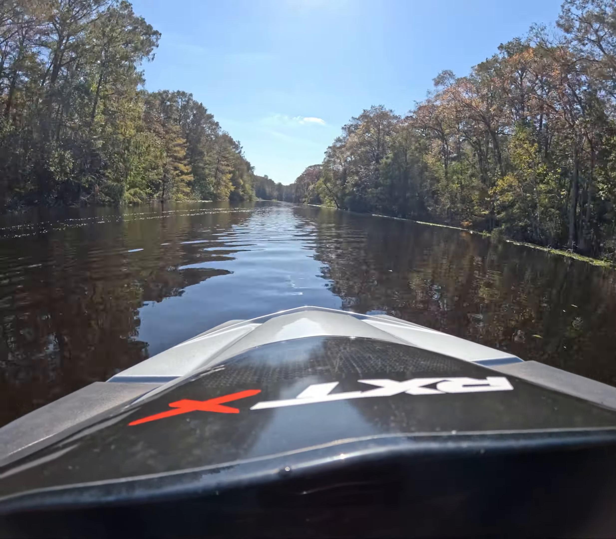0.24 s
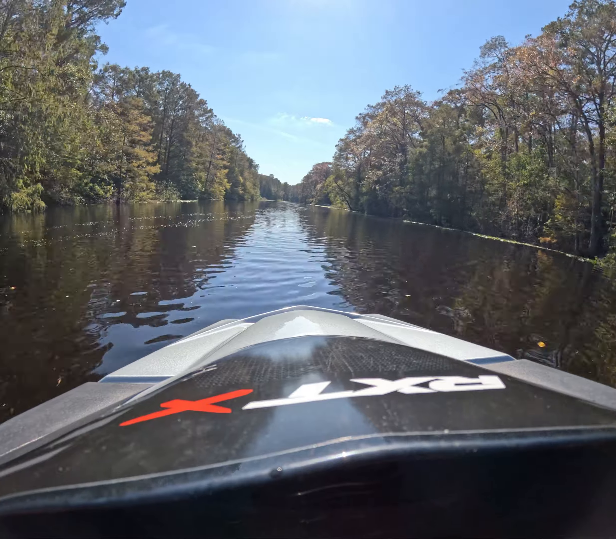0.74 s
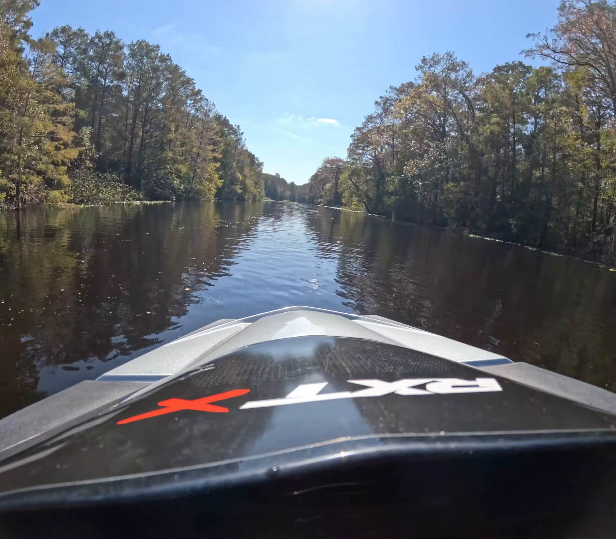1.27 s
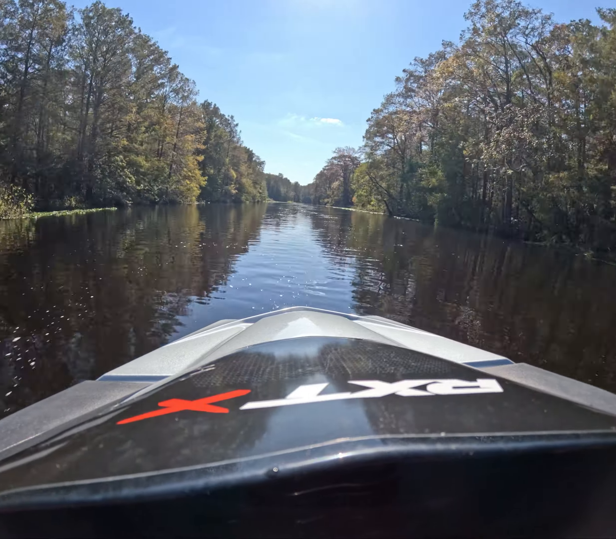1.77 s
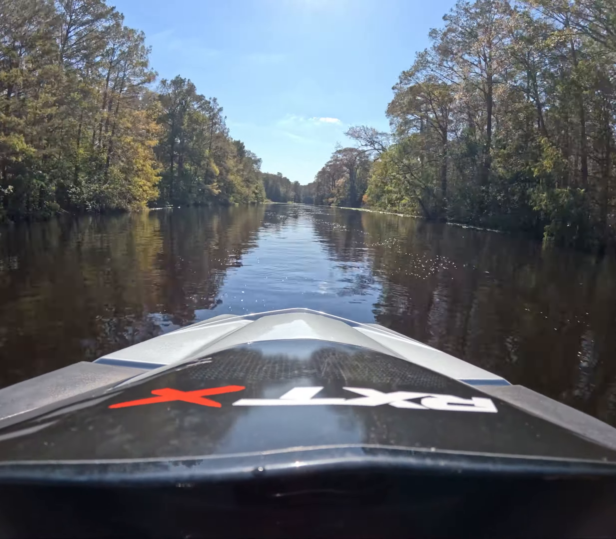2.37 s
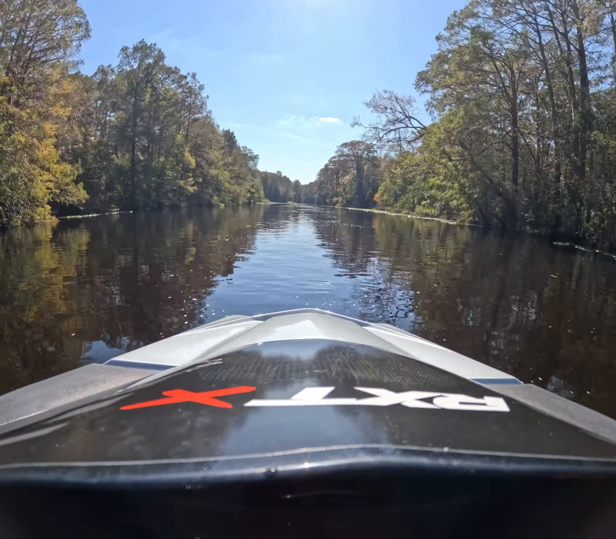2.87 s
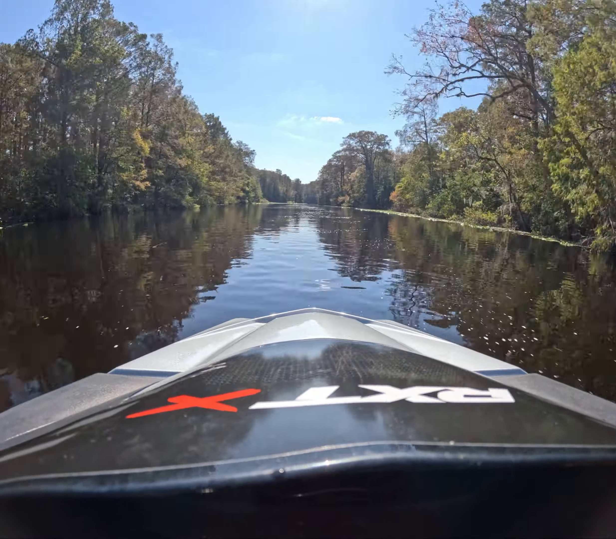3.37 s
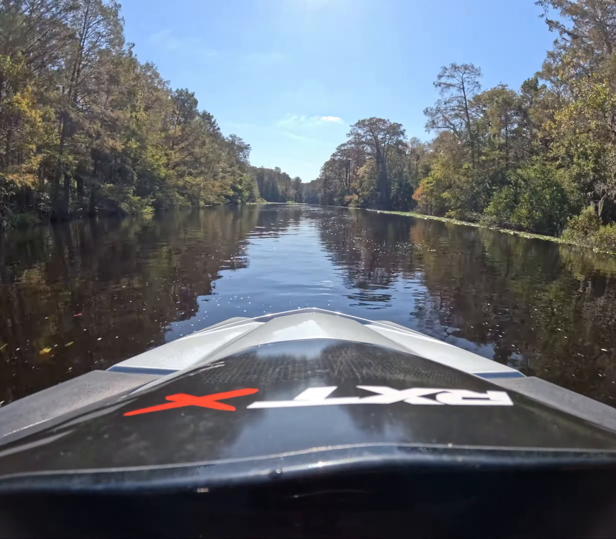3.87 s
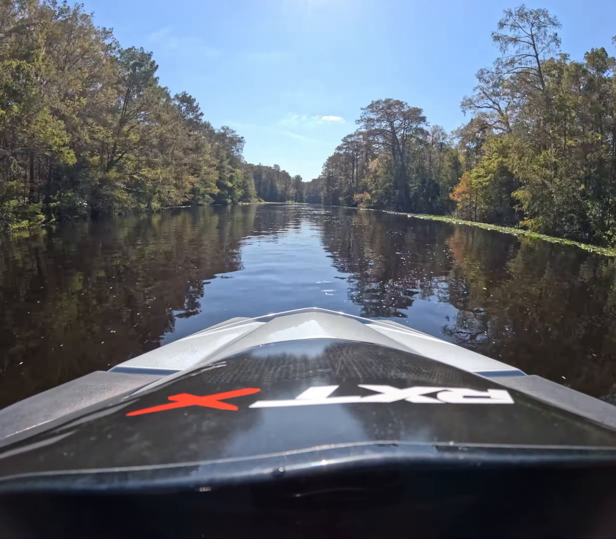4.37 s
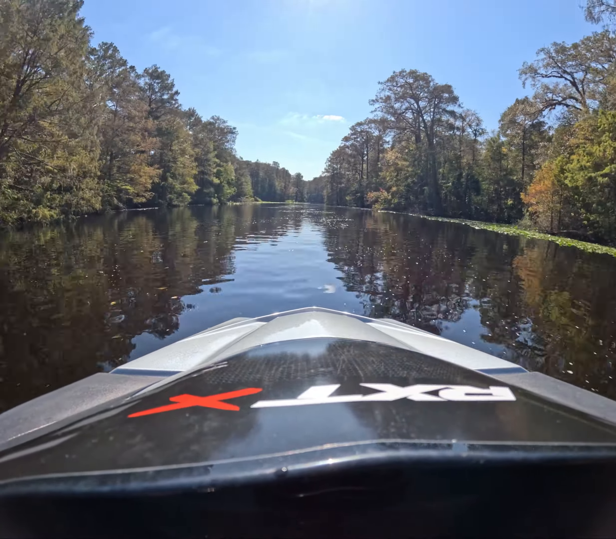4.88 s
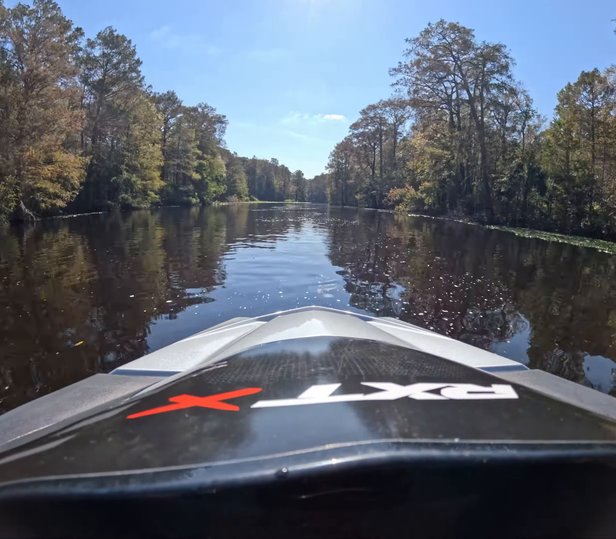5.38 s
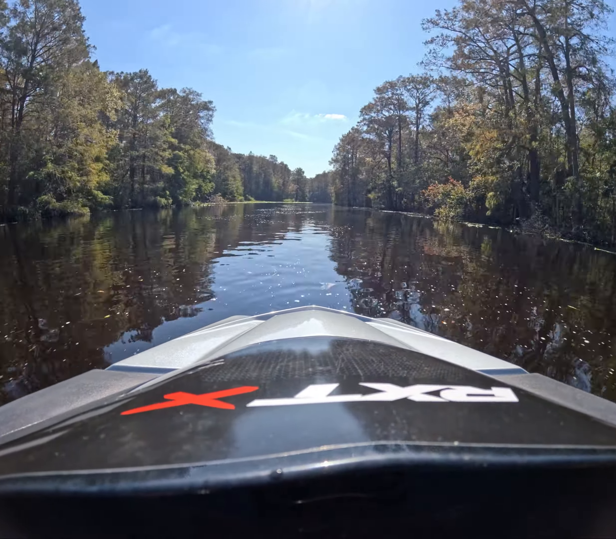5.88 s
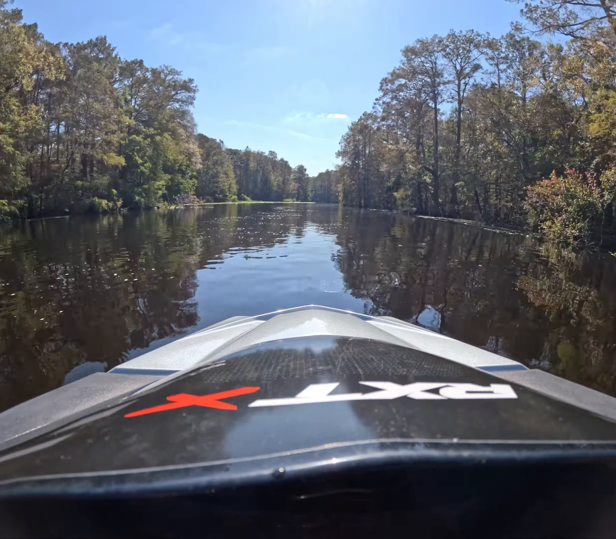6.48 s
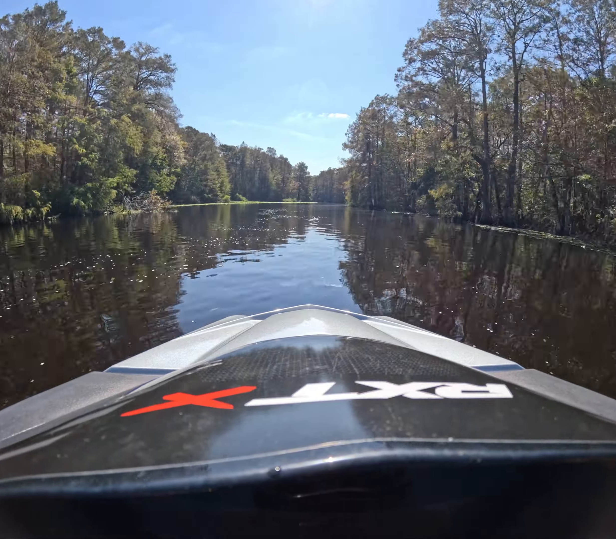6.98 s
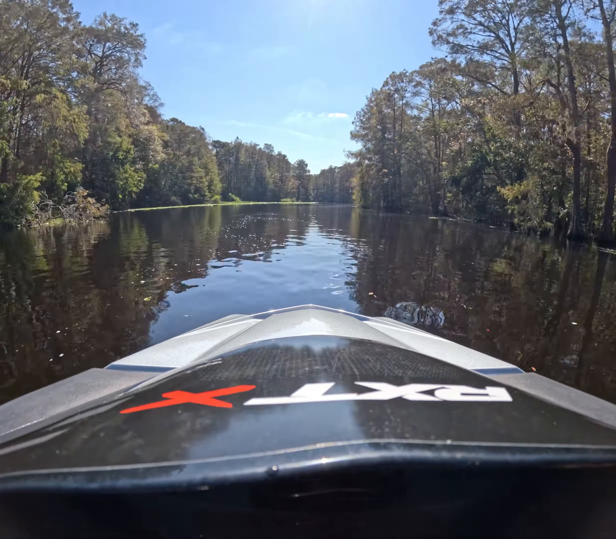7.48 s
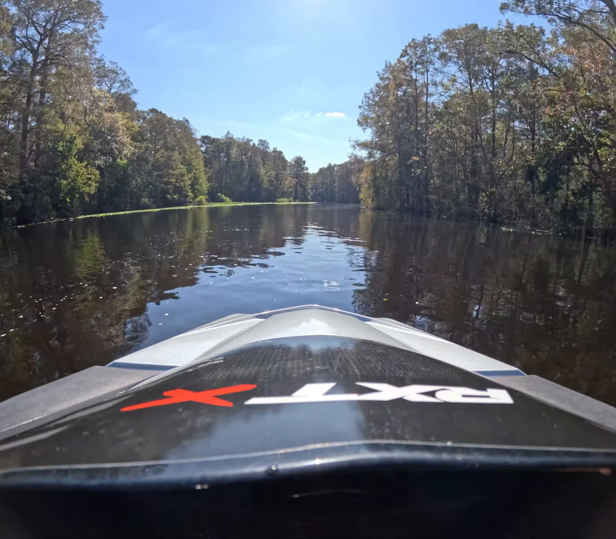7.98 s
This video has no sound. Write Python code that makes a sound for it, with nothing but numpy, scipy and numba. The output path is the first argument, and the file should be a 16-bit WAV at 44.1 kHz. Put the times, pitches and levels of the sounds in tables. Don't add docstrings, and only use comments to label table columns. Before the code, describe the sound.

A continuous onboard roar: low wind buffeting, broad airy rush and water drumming against a hull, with a steady motor drone underneath. Early hiss gives way to a brief drop in engine pitch and soft, hollow groans over ripples. The hum returns weaker, the hiss thins, then near the end wind and motor lift together before the hiss falls away. Outdoors on open water, microphone exposed on the bow, levels tightly compressed.

```python
import sys
import numpy as np
from scipy import signal
from scipy.fft import rfft, irfft, next_fast_len
from scipy.io import wavfile
from scipy.ndimage import uniform_filter1d
from numba import njit

SR = 44100
rng = np.random.default_rng(int(sys.argv[2]) if len(sys.argv) > 2 else 0)


def gain_from_decibels(decibels):
    exponent = np.asarray(decibels, float) / 20
    return 10 ** exponent


def store_pcm(level_fs):
    pcm = np.round(np.clip(level_fs, -1, 1) * 32767).astype(np.int16)
    wavfile.write(sys.argv[1], SR, np.atleast_2d(pcm).T)


N = 362943

# time_s, firing_hz, firing_tone_db
ENGINE_RUN = [(0, 136.8, -21), (.9, 136.8, -19), (1.5, 137.3, -20.5), (1.93, 137.5, -20), (2.08, 122, -21),
              (2.22, 96, -21.5), (2.36, 86, -40), (2.7, 137, -40), (3.08, 137.5, -26), (3.3, 137.5, -33),
              (4.1, 138, -23), (4.5, 135.5, -24), (4.75, 136, -38), (6.4, 140, -34), (6.85, 143, -22),
              (7.2, 144.5, -22), (7.6, 147, -24), (7.8, 147, -42)]
# multiple_of_firing_rate [ratio], level_against_firing_tone_db
ENGINE_ORDERS = [(4 / 3, -14), (3 / 2, -11), (2, -9.5), (3, -13), (7 / 2, -22), (5, -18), (6, -17)]
# time_s, drumming_db, slap_treble_against_bass_db
WETTED_LENGTH = [(0, -24.5, -1), (.7, -20.5, -1.5), (1.2, -24.5, -5.5), (1.7, -20.5, 8), (2.3, -22, 0),
                 (2.95, -20.5, 9), (3.35, -18.5, 0), (4.25, -22, -1), (4.5, -20.5, -6), (5.35, -20, 2),
                 (6.2, -22, -2.5), (6.7, -20, -0.5), (7.2, -19, 1.5), (7.55, -21, -3), (7.95, -19.5, -2),
                 (8.23, -20, 2.5)]
# middle_s, length_s, rise_db, lean_to_treble_db
HOUSING_SHOVES = [(.3, .5, -0.5, 2), (.68, 0.27, 5, -3), (1.2, 0.57, 1.5, -10), (2.0, 0.37, 2, -1),
                  (2.55, 1.7, 2.5, 2.5), (2.96, 0.18, 5, -4.5), (3.34, 0.23, 2.5, -0.5),
                  (5.1, 0.81, 1.5, 8), (5.75, 0.49, 2.5, 2), (6.17, 0.28, 2, -1.5), (6.49, 0.13, 0, -7.5),
                  (6.68, 0.11, 0, -2), (7.36, 0.34, 3, -3), (8.1, 0.6, 4, -2.5)]
# middle_s, start_hz, end_hz,
# length_s, level_db
HULL_MOANS = [(.12, 232, 241, .22, -28), (.68, 54, 52, .2, -26), (.72, 118, 104, .18, -27),
              (.78, 272, 276, .2, -30), (1.14, 283, 275, .18, -30), (1.16, 62, 98, .24, -26),
              (1.69, 279, 285, .2, -27), (1.7, 364, 365, .16, -31), (2.35, 94, 84, .24, -21),
              (6.57, 140, 139, .16, -24), (2.54, 72, 57, .3, -20), (2.7, 68, 102, .26, -21),
              (2.72, 56, 58, .2, -21), (2.81, 142, 152, .16, -24), (2.88, 351, 350, .16, -30),
              (3.0, 79, 74, .2, -23), (3.25, 249, 255, .25, -25), (3.32, 84, 74, .18, -25),
              (3.95, 265, 267, .2, -29), (4.26, 265, 263, .2, -29), (4.55, 205, 226, .2, -27),
              (5.25, 178, 165, .14, -24), (5.27, 270, 272, .2, -27), (5.4, 164, 164, .26, -20.5),
              (5.55, 235, 233, .18, -28), (5.71, 80, 98, .2, -21.5), (5.83, 148, 152, .24, -25),
              (6.01, 267, 268, .2, -28), (6.2, 58, 82, .2, -23), (6.22, 101, 114, .22, -25),
              (6.5, 70, 57, .18, -25), (6.64, 174, 160, .2, -21), (7.21, 193, 195, .2, -26),
              (7.35, 295, 295, .24, -25), (7.55, 214, 214, .2, -25), (7.98, 260, 266, .2, -28),
              (8.17, 102, 104, .14, -23)]
# time_s, gust_db, eddy_fineness_db
PORT_WIND = [(0, -1, -1.5), (.66, 7, 1), (1.2, 6, 0.5), (1.45, 5.5, 2), (2.0, 0.5, 3.5), (2.8, -2, 4),
             (3.45, -1.5, 3.5), (3.8, -0.5, 8), (4.22, 2, 5), (4.45, 1.5, 3), (5.5, -2, 3),
             (5.75, -2.5, -1), (6.33, -4.5, -2), (6.45, 1, 0.5), (6.75, 5.5, 0.5), (7.3, 6, -3.5),
             (7.62, -3.5, -7.5), (8.23, -5, -4)]
# middle_s, length_s, depth_db
COWL_LEES = [
    (2.31, .05, 0),
    (5.91, 0.043, 7.5),
    (6.54, 0.093, 5),
    (6.78, .5, 4),
    (7.0, 0.54, 4.5),
    (7.2, 0.68, 2.5),
    (8.21, 0.043, 3.5),
]
# middle_s, rise_db
PORT_PUFFS = [(.19, -1), (.99, 1.5), (1.21, -4), (1.46, 2), (1.64, 1.5), (1.81, -1.5), (1.9, 2.5),
              (2.1, -1), (2.33, -2), (2.39, 1), (2.78, -2), (3.04, 1.5), (3.32, 1.5), (3.44, -1),
              (4.09, -2), (4.21, 3.5), (4.31, 1.5), (4.46, -3), (4.67, 0.5), (4.98, -0.5), (5.08, -1.5),
              (5.42, 4), (5.54, -1), (6.3, 0.5), (6.44, 1), (6.76, 0), (6.9, -4), (7.1, -2), (7.6, 1.5),
              (7.96, 6), (8.06, 4)]
# frequency_hz, density_db_per_hz
BUFFET_COLOUR = [(12, -21), (25, -6), (40, -4), (60, -1), (90, -0.5), (130, -4.5), (180, -13), (300, -44.5)]
# frequency_hz, density_db_per_hz
DRUM_COLOUR = [(70, -32.5), (120, -4), (170, -1.5), (250, -3), (300, -4.5), (400, -9.5), (600, -28),
               (1000, -56.5)]
# frequency_hz, density_db_per_hz
RUSH_COLOUR = [(200, -25), (350, -4), (500, 0), (850, -1), (1200, -3.5), (1600, -8), (2200, -17.5),
               (3500, -39.5)]
# frequency_hz, density_db_per_hz
HISS_COLOUR = [(900, -30), (1600, -2), (2000, -1.5), (3000, -6.5), (4000, -15.5), (5000, -26), (7000, -48),
               (9000, -67)]
# frequency_hz, density_db_per_hz
THIN_COLOUR = [(3500, -14.5), (5000, -0.5), (7800, -13), (8600, -8), (9300, -13.5), (11700, -24.5),
               (14000, -39), (16000, -60)]


def walk(rate_hz):
    hold = max(int(SR / rate_hz), 2)
    levels = np.repeat(rng.standard_normal(N // hold + 1), hold)
    slewed = uniform_filter1d(uniform_filter1d(levels, hold), hold)[:N]
    return slewed / slewed.std()


def curves(table):
    s, *columns = np.transpose(table)
    return [np.interp(np.arange(N) / SR, s, column) for column in columns]


def swells(rows):
    rows, t = np.array(rows), np.arange(N) / SR
    progress = np.clip((t - rows[:, :1]) / rows[:, 1:2] + .5, 0, 1)
    return rows[:, 2:].T @ np.sin(np.pi * progress) ** 2


def turbulence(colour, shared_db, own_db, own_rate, count, tilt_db=0):
    size = next_fast_len(N)
    octave = np.log2(np.arange(size // 2 + 1) * SR / size + 1)
    hz, db = np.transpose(colour)
    knots = np.log2(hz)
    centres = np.linspace(knots[1], knots[-2], num=count)
    total = 0
    for k in range(count):
        share = np.sqrt(np.interp(octave, centres, np.arange(count) == k))
        lean_db = tilt_db * (k / (count - 1) - .5)
        band_db = shared_db + lean_db + own_db * walk(own_rate)
        puff = rng.standard_normal(N) * gain_from_decibels(band_db)
        total = total + share * rfft(puff, size)
    colour_db = np.interp(octave, knots, db, left=-200, right=-200)
    out = irfft(total * gain_from_decibels(colour_db), size)[:N]
    return out / out.std()


def engine():
    hz, load_db = curves(ENGINE_RUN)
    phase = 2 * np.pi * np.cumsum(hz * (1 + 0.00398 * walk(8))) / SR
    orders = np.zeros(N)
    for multiple, db in ENGINE_ORDERS:
        level = gain_from_decibels(db + 2.2 * walk(4.6))
        offset = 2 * np.pi * rng.random() + .35 * walk(9)
        orders += level * np.sin(multiple * phase + offset)
    orders_db = -24 + .5 * (load_db + 22) + .3 * (hz - 137)
    firing = gain_from_decibels(load_db + 1.1 * walk(14)) * np.sin(phase)
    return np.sqrt(2) * (firing + gain_from_decibels(orders_db) * orders)


def hull():
    drum_db, drum_tilt_db = curves(WETTED_LENGTH)
    shove_db, lean_db = swells(HOUSING_SHOVES)
    buffet_db = -21 + shove_db - .3 * (drum_db - drum_db.mean())
    buffet = turbulence(BUFFET_COLOUR, 0, own_db=-0.77, own_rate=4.8, count=4, tilt_db=0.5 + lean_db)
    drum = turbulence(DRUM_COLOUR, 0, own_db=-0.1, own_rate=6.0, count=4, tilt_db=drum_tilt_db)
    return gain_from_decibels(buffet_db) * buffet + gain_from_decibels(drum_db + 0.94) * drum


def moans():
    out = np.zeros(N + SR)
    waver = np.append(1 + .015 * walk(14), np.ones(SR))
    for middle_s, start_hz, end_hz, length_s, db in HULL_MOANS:
        progress = np.linspace(0, 1, int(length_s * SR))
        first = int((middle_s - length_s / 2) * SR)
        span = slice(first, first + len(progress))
        hz = (start_hz + (end_hz - start_hz) * progress) * waver[span]
        phase = 2 * np.pi * np.cumsum(hz) / SR
        swell = np.sin(np.pi * progress) ** 2
        out[span] += np.sqrt(2) * gain_from_decibels(db) * swell * np.sin(phase)
    return out[:N]


def wind():
    gust_db, fine_db = curves(PORT_WIND)
    lee_db = swells(COWL_LEES)[0]
    puff_db = swells([(s, 0.059, db) for s, db in PORT_PUFFS])[0]
    eddies = .35 * walk(11) + .05 * walk(45) + 1.6 * walk(500)
    flutter = walk(16)
    flutter = flutter - uniform_filter1d(flutter, size=SR // 4)
    rush_gusts = .7 * eddies + .9 * walk(400)
    hiss_gusts = 0.99 * puff_db + .35 * flutter + .8 * eddies + 1.7 * walk(700)
    thin_gusts = puff_db + .4 * flutter + .7 * eddies + 1.3 * walk(900)
    rush = turbulence(RUSH_COLOUR, rush_gusts, own_db=-0.4, own_rate=5.3, count=5, tilt_db=fine_db)
    hiss = turbulence(HISS_COLOUR, hiss_gusts, own_db=0.24, own_rate=11.0, count=5, tilt_db=lee_db)
    thin = turbulence(THIN_COLOUR, thin_gusts, own_db=0.3, own_rate=12.0, count=5)
    rush_db = -19.5 + 0.069 * gust_db - lee_db
    hiss_db = -34.5 + 0.69 * gust_db + 0.17 * fine_db - 0.19 * lee_db
    thin_db = -56 + 0.81 * gust_db
    return gain_from_decibels(rush_db) * rush + gain_from_decibels(hiss_db) * hiss + gain_from_decibels(thin_db) * thin


def scene():
    return (engine() + hull() + moans() + wind())[None]


@njit
def follow(x, attack, release):
    level, out = .15, np.empty(len(x))
    for i in range(len(x)):
        size = abs(x[i])
        level += (size - level) * (attack if size > level else release)
        out[i] = level
    return out


def band_limit(x):
    return signal.sosfilt(signal.butter(12, 15100, fs=SR, output="sos"), x)


def record(dry):
    attack_s, release_s = 0.0029, 0.026
    level = follow(dry[0], 1 / (attack_s * SR), 1 / (release_s * SR))
    gain = uniform_filter1d((.2 / level) ** 0.55, size=200)
    ahead = np.append(gain[150:], np.full(150, gain[-1]))
    ahead *= np.clip(np.arange(N) / 12, 0, 1) ** 2
    return band_limit(dry * ahead * gain_from_decibels(0.97))


dry = scene()
out = record(dry)
store_pcm(out)
```